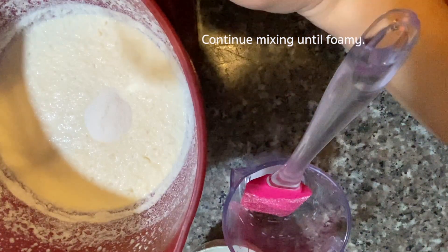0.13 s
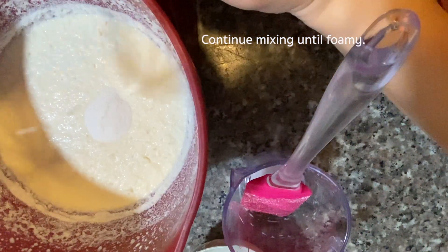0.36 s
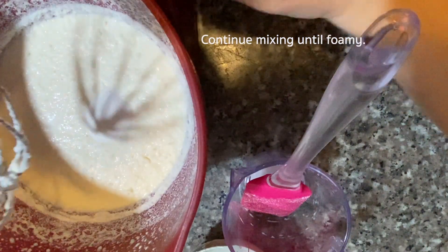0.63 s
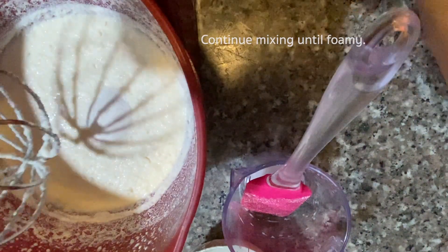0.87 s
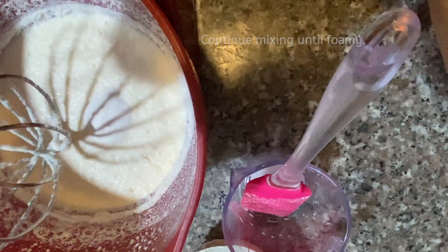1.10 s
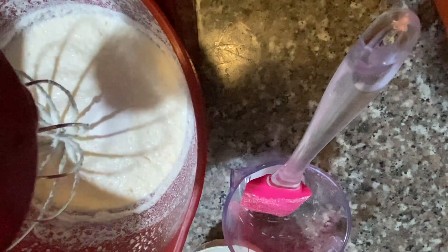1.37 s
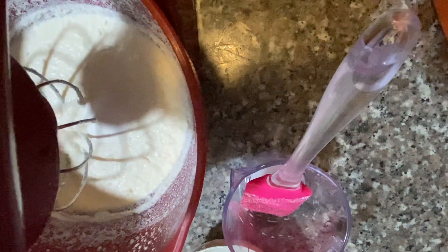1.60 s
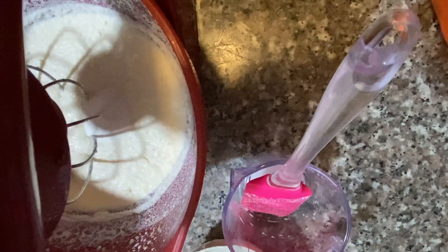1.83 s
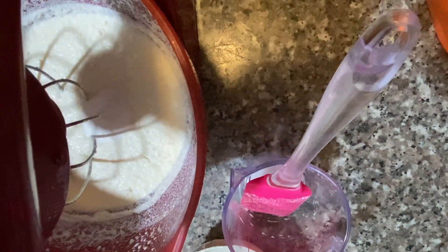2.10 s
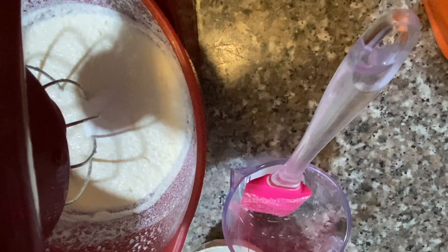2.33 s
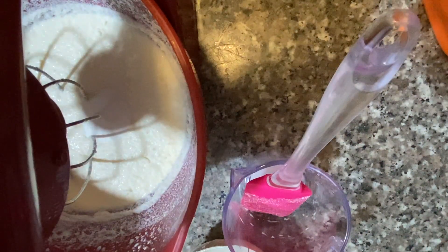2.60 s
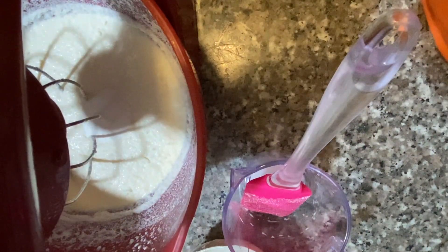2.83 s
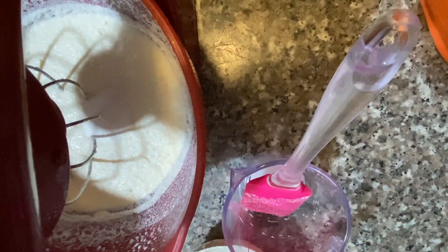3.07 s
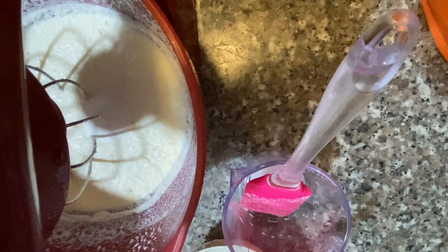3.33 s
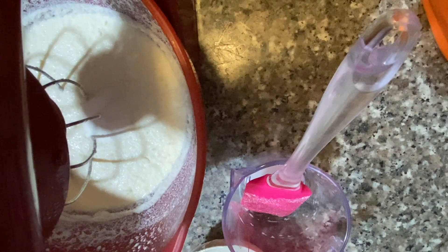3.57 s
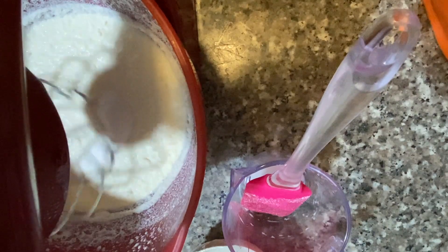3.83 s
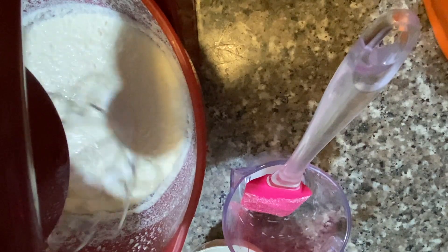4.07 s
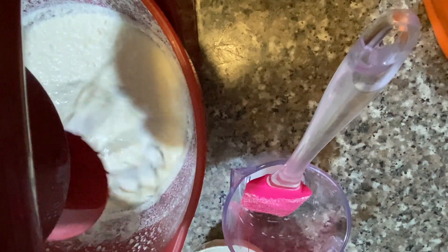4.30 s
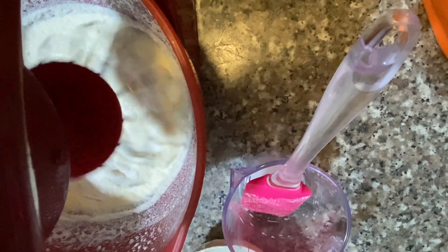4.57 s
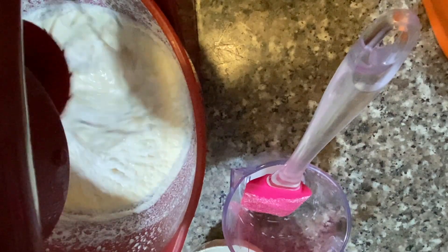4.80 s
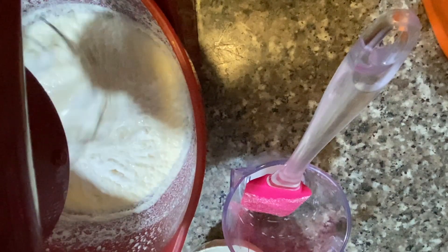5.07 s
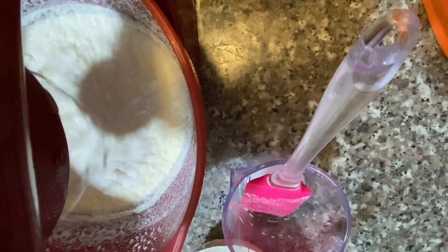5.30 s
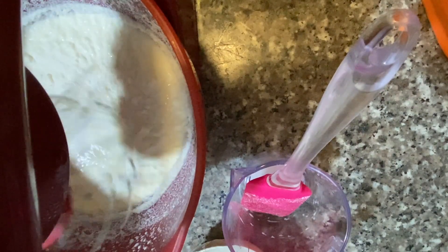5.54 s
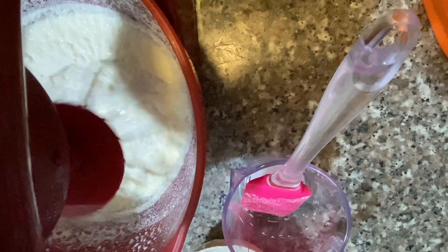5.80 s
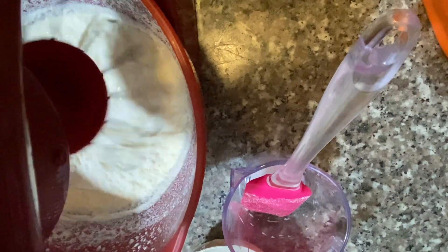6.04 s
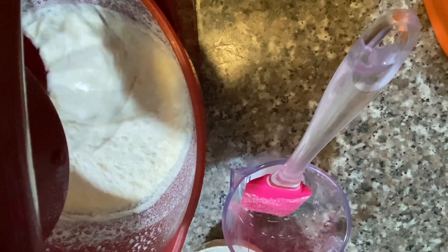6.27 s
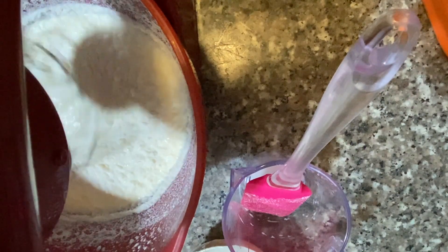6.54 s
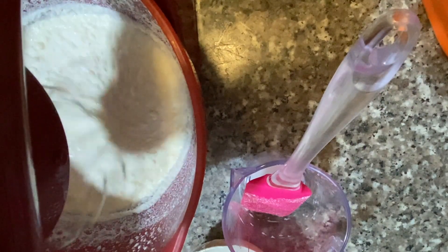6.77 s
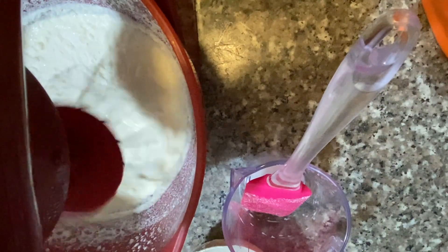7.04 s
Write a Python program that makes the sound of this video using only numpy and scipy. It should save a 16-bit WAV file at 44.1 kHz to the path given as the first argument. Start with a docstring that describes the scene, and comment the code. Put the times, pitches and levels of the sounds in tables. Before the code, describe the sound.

Light plastic bumps and hand friction come first, with a small metallic whisk touch and a hard two-part clack standing out before quieter taps. Then an electric mixer hums, shudders and spins up quickly, holding a loud, buzzy, gear-toned whirr with airy hiss before stepping up in pitch at the end. Close stereo pickup in a kitchen with short reflections and a low, faint room tone.

```python
"""On a kitchen counter a hand mixer with a wire whisk runs in a plastic bowl, heard by two close microphones.
It is first handled: filtered noise bursts and decaying modes make knocks, a latch that snaps twice and
wire touches; grainy noise makes soft rubbing. Then the motor buzzes, spins up, holds its speed and speeds up
again: sines follow the speed through fixed resonances of housing and bowl, over hum, rumble and whirr.
Reflections and a faint room tone surround it."""
import sys
import numpy as np
from scipy import signal
from scipy.fft import rfft, irfft, next_fast_len
from scipy.io import wavfile
from scipy.ndimage import uniform_filter1d

SR = 44100
rng = np.random.default_rng(int(sys.argv[2]) if len(sys.argv) > 2 else 0)


def log_audio(samples):
    """Write samples as a 16-bit WAV file to the path given in sys.argv[1]."""
    # one column per channel
    frames = np.atleast_2d(samples).T
    # limit to full scale, then quantise
    limited = np.clip(frames, -1, 1)
    pcm = np.round(limited * 32767).astype(np.int16)
    wavfile.write(sys.argv[1], SR, pcm)


def ratio_of_db(decibels):
    """Turn decibels (scalar or array-like) into linear amplitude factors; 0 dB maps to 1."""
    return 10 ** (np.asarray(decibels, float) / 20)


N = 315315

# resonances of the whirr, which also lift the gear tones: (frequency [Hz], width [Hz], level [dB])
WHIRR_PEAKS = [(1020, 110, 0), (1570, 110, 1), (1975, 130, 3), (2550, 170, -1), (4950, 250, -14)]
# strongest resonance, shaken hardest in the surges: (frequency [Hz], width [Hz], level [dB])
BOOM = [(440, 75, 0)]
WHIRR_DB = -37   # reference level of the whirr at working speed


def rms_one(x):
    """Scale to rms 1."""
    return x / np.sqrt(np.mean(x ** 2) + 1e-20)


def in_time(rows):
    """Columns of a table, interpolated sample by sample."""
    s, *columns = np.transpose(rows)
    return [np.interp(np.arange(N) / SR, s, c) for c in columns]


def swells(rows):
    """Sum of bells from (centre [s], height, length [s] between the points 41 dB down)."""
    t = np.arange(N) / SR
    return sum(height * np.exp(-(4.36 * (t - s) / length) ** 2) for s, height, length in rows)


def band(x, low_hz, high_hz):
    """Butterworth band-pass."""
    return signal.sosfilt(signal.butter(2, [low_hz, high_hz], "band", fs=SR, output="sos"), x)


def drift(rate):
    """Slow random wander of rms 1: noise through two equal poles of bandwidth rate [Hz]."""
    r = np.exp(-80 * np.pi * rate / SR)   # one step per 40 samples
    white = rng.standard_normal(N // 40 + 2002)
    slow = signal.lfilter([1], [1, -2 * r, r * r], white)[2000:]
    return np.interp(np.arange(N) / 40, np.arange(len(slow)), rms_one(slow))


def coloured(spectrum):
    """Noise of rms 1 shaped by (frequency [Hz], level [dB per Hz])."""
    hz, db = np.transpose(spectrum)
    bins = np.arange(N // 2 + 1) * SR / N
    gain = ratio_of_db(np.interp(np.log(bins + 1), np.log(hz), db))
    return rms_one(irfft(rfft(rng.standard_normal(N)) * gain, N))


def resonate(x, modes):
    """Parallel two-pole resonances from (frequency [Hz], width [Hz], level [dB])."""
    out = 0
    for hz, width, db in modes:
        r = np.exp(-np.pi * width / SR)
        poles = [1, -2 * r * np.cos(2 * np.pi * hz / SR), r * r]
        out = out + ratio_of_db(db) * signal.lfilter([(1 - r * r) / 2, 0, (r * r - 1) / 2], poles, x)
    return out


def tone(turns, waver_db, waver_rate):
    """A sine of rms about 1 whose level and phase wander a little."""
    level = np.sqrt(2) * ratio_of_db(waver_db * drift(waver_rate))
    return level * np.sin(2 * np.pi * (turns + rng.random()) + .5 * drift(waver_rate))


def motor():
    """The drive's speed, load and strain steer its tones and its noise; returns the two."""
    # speed: (time [s], gear mesh tone [Hz])
    speed = [(3.5, 140), (3.9, 286), (4.28, 428), (4.6, 501), (6.45, 501), (6.76, 610), (7.15, 785)]
    # the motor labours and shakes its housing: (time [s], extra level [dB], length [s])
    surges = [(3.62, 14.5, 0.21), (3.735, 19.5, 0.25), (3.92, 16.5, 0.32), (4.1, 11, 0.51),
              (4.32, 11.5, 0.59), (4.52, 7, .12), (6.63, 13.5, 0.48), (6.92, 9.5, 0.21)]
    switch_on_s, engaged_s, creep_db_per_s = 3.3, 3.719, 91.5
    full_pull_hz_per_s = 350   # gain of speed at full strain
    t = np.arange(N) / SR
    mesh_hz, = in_time(speed)
    running = t > switch_on_s
    acceleration = uniform_filter1d(np.gradient(mesh_hz) * SR, size=SR // 8)
    strain = np.clip(acceleration / full_pull_hz_per_s, 0, 1)
    # the drive creeps in until the gears take load
    creep_db = -creep_db_per_s * np.maximum(engaged_s - t, 0)
    surge_db = swells(surges)
    # the whirr grows by 8 dB per octave of speed and with strain
    whirr_db = WHIRR_DB + 8 * np.log2(np.maximum(mesh_hz, 240) / 501) + 1.27 * strain + creep_db
    boom_db = -38 + surge_db + 0.55 * creep_db
    tones = gear_tones(mesh_hz, strain, whirr_db, boom_db) + mains_hum(creep_db, surge_db)
    noise = housing_rumble(whirr_db, boom_db) + whirring(whirr_db)
    return running * tones, running * noise


def gear_tones(mesh_hz, strain, whirr_db, boom_db):
    """Rotor and gear sines follow the speed and swell as they cross fixed resonances."""
    # multiples of the mesh tone, one column: (ratio [1]); the rotor turns at about .259 of it
    ratios = np.array([.088, .13, .2587, .425, .583, .742, .862, 1, 1.258, 1.3, 1.44, 1.552, 1.81, 2.01,
                       2.34, 2.5, 3.125, 3.915, 4.25, 5.05])
    # their strengths in the same sequence, one column: (level [dB])
    levels = ratio_of_db(np.array([-95, -57, -47.5, -61, -46.5, -48.5, -53, -34, -49.5, -44.5, -45.5, -48, -41.5,
                           -35, -50, -35, -42.5, -43.5, -43, -51]))
    # resonances that lift passing tones: (frequency [Hz], width [Hz], level [dB])
    housing = [(264, 100, 1), (670, 65, 2)]
    hunt_hz, hunt_rate_hz = 2.0, 3.0   # the speed hunts around its setting
    turns = np.cumsum(mesh_hz + hunt_hz * drift(hunt_rate_hz)) / SR
    # higher tones waver faster
    orders = np.array([tone(k * turns, waver_db=2.2, waver_rate=5 + 4 * k) for k in ratios])
    upper = ratios > 1
    blur = ratio_of_db(-11 * strain)   # gear tones sink into the noise while the speed rises
    low = (levels * ~upper) @ orders
    high = blur * ((levels * upper) @ orders)
    direct = band(blur * low + high, 26, 990)
    in_housing = resonate(low + high, housing)
    in_peaks = ratio_of_db(-5.5) * resonate(resonate(levels @ orders, WHIRR_PEAKS), WHIRR_PEAKS)
    # the tones grow until the working load is reached
    load = ratio_of_db(1.1 * np.minimum(whirr_db - WHIRR_DB, 0) + 0.15)
    boom = ratio_of_db(boom_db - 5.0) * resonate(resonate(orders.sum(axis=0), BOOM), BOOM)
    return load * (direct + in_housing + in_peaks) + boom


def mains_hum(creep_db, surge_db):
    """Magnetic hum at whole multiples of the mains, with a buzz before the rotor breaks free."""
    # (multiple of the mains [1], rounded for pitch, running level [dB], buzz level [dB])
    harmonics = [(1.986, -9.5, -59), (4.02, -10.5, -72), (5.996, 2, -88), (7.09, -12.5, -52),
                 (7.77, -12, -41.5), (10.05, -18, -57), (12, -4.5, -43.5), (13.9, -25.5, -68),
                 (19.93, -11, -74), (39.84, -17, -80)]
    # rise and fall of the buzz: (time [s], level [dB])
    buzz_course = [(3.36, -35), (3.43, -8.5), (3.58, -3), (3.68, -13)]
    mains_hz = 60.1
    mains = mains_hz * np.arange(N) / SR
    buzz = ratio_of_db(in_time(buzz_course)[0])
    hum_db = -38 + 0.79 * creep_db
    hum = 0
    for multiple, db, buzz_db in harmonics:
        # hum near the boom takes the largest share of each surge
        nearness = np.exp(-np.log2(multiple * mains_hz / BOOM[0][0]) ** 2)
        level = ratio_of_db(hum_db + db + 0.28 * surge_db * nearness) + buzz * ratio_of_db(buzz_db)
        hum = hum + level * tone(round(multiple) * mains, waver_db=3.0, waver_rate=2.7)
    return hum


def housing_rumble(whirr_db, boom_db):
    """Low noise shakes the housing and rings its boom."""
    # rumble spectrum: (frequency [Hz], level [dB per Hz])
    spectrum = [(24, -55), (45, -29), (110, -7), (190, -8), (300, -1), (520, -13), (800, 4), (1100, -5.5),
                (1600, -51.5)]
    shake = coloured(spectrum)
    boom = ratio_of_db(boom_db - 6.5) * rms_one(resonate(resonate(shake, BOOM), BOOM))
    return ratio_of_db(0.52 * whirr_db - 14 + 3.3 * drift(5.2)) * shake + boom


def whirring(whirr_db):
    """Gears and brushes make resonant noise, air through the fan a bright hiss; both flutter together."""
    # whirr spectrum: (frequency [Hz], level [dB per Hz])
    spectrum = [(350, -59), (600, 10), (714, -2), (1320, -2), (1560, 3.5), (2540, -8.5), (4550, -16.5),
                (7260, -28), (8000, -60), (10400, -82), (17600, -120)]
    peaks = resonate(resonate(rng.standard_normal(N), WHIRR_PEAKS), WHIRR_PEAKS)
    whirr = rms_one(coloured(spectrum) + ratio_of_db(11) * peaks)
    air = rms_one(band(rng.standard_normal(N), 8500, 19845))
    # the hiss gains 0.15 extra dB for each dB of whirr
    hiss = ratio_of_db(-23 + 0.15 * (whirr_db - WHIRR_DB)) * air
    return ratio_of_db(whirr_db + 3.5 + 0.88 * drift(42)) * (whirr + hiss)


def knocks():
    """Each blow is a short crack with small bounces that sets off the body modes near its main ring."""
    # (time [s], low ring level [dB], high ring level [dB], treble snap level [dB], main ring [Hz])
    blows = [(0.049, -36, -41.5, -70, 258), (0.1014, -40, -88, -79, 237), (0.1542, -36, -55, -68, 237),
             (0.2844, -39, -51.5, -80, 242), (0.311, -31.5, -38.5, -24.5, 364), (0.426, -62, -70, -45, 254),
             (0.499, -27.5, -37.5, -103, 198), (0.5707, -39, -70, -75, 363), (0.596, -36.5, -55, -75, 313),
             (0.7595, -40.5, -50, -92, 356), (0.877, -54, -59, -46.5, 345), (0.914, -47, -50, -38.5, 397),
             (1.188, -58, -60.5, -53.5, 248), (1.21, -29, -36.5, -40.5, 390), (1.3576, -30, -42, -79, 497),
             (1.4416, -65.5, -62.5, -46, 345), (1.5054, -42, -51.5, -25, 344),
             (1.5247, -40, -49.5, -38.5, 286), (1.641, -49.5, -66.5, -65.5, 290),
             (1.707, -11.5, -21, -5.5, 367), (1.7322, -25, -20, -7.5, 363), (1.9733, -42.5, -46, -41, 330),
             (2.534, -51, -70, -67, 368), (2.594, -51.5, -66, -66, 357), (2.9426, -45.5, -50, -54, 240),
             (2.9749, -43.5, -47, -33.5, 350), (3.0608, -52.5, -65, -84, 340),
             (3.267, -32.5, -41, -25, 413), (6.1764, -53, -50, -25.5, 497), (6.202, -50, -42.5, -20.5, 498)]
    # bowl and mixer body modes: (frequency [Hz], level [dB], decay [s]);
    # decay is to -60 dB below 700 Hz, and about four times shorter above
    body = [(104, -5.5, 0.29), (237, 2.5, 0.16), (293.9, -2.5, 0.22), (341.3, 5.5, 0.072), (361, 0, 0.21),
            (414.6, -5, 0.17), (501.4, 4.5, 0.082), (599.6, -1.5, 0.12), (750, 6.5, 0.035),
            (1080, 7.5, 0.033), (1160, 4.5, 0.02), (1704, -11.5, 0.025), (2400, -19.5, 0.36),
            (3020, -24.5, 0.19), (3980, -23.5, 0.046)]
    rise_s = 0.0022   # a blow builds up
    out, t = np.zeros(N + SR), np.arange(SR // 3) / SR
    upper_modes = [(hz, 9 / decay, db) for hz, db, decay in body if hz >= 700]
    for s, ring_db, clack_db, snap_db, ring_hz in blows:
        noise = rng.standard_normal(len(t))
        shape = np.minimum(t / rise_s, 1) * (np.exp(-(t / 0.0031) ** 2) + 0.25 * np.exp(-t / 0.028))
        for wait, size in rng.random((3, 2)):   # bounces 6 to 12 ms later
            shape += ratio_of_db(-23 - 4.5 * size) * np.exp(-((t - .006 - 0.006 * wait) / 0.0043) ** 2)
        crack = band(band(noise * shape, 1300, 5000), 1300, 5000)
        snap = band(noise[::-1] * shape ** 2, 7000, 15500)
        # the crack grows with both the high ring and the snap
        crack = (ratio_of_db(clack_db - 10) + ratio_of_db(snap_db + 1)) * crack + ratio_of_db(snap_db) * snap
        ring = 0
        for hz, db, decay in body:
            if hz < 700:
                size, phase = rng.random(2)
                off_db = 12.4 * min(abs(np.log2(hz / ring_hz)), 1)   # weaker away from the main ring
                level = ratio_of_db(ring_db + 3.0 - off_db + db + 0.51 * (size - 2.0) - 60 * t / decay)
                ring = ring + level * np.sin(2 * np.pi * (hz * t + phase))
        ring = ring * (1 - np.exp(-t / 0.0034))   # swells as the body takes up the blow
        # the crack rattles the upper modes
        clack = ratio_of_db(clack_db + 19.5) * resonate(band(noise * shape, 350, 3900), upper_modes)
        i = round(s * SR)
        out[i:i + len(t)] += crack + ring + clack
    return out[:N]


def wires():
    """The whisk touches the bowl: each burst of a few ms sets the wire modes ringing."""
    # (time [s], level [dB])
    touches = [(0.4998, -22), (1.21, -36)]
    # wire modes: (frequency [Hz], level [dB], decay [s]); the ring takes about 1.8 times that to -60 dB
    wire_modes = [(2680, 1.5, 0.024), (3040, 3.5, 0.031), (2370, -11.5, .05)]
    t = np.arange(N) / SR
    pulses = sum(ratio_of_db(db) * (t > s) * np.exp(-(np.maximum(t - s, 0) / .004) ** 2) for s, db in touches)
    burst = pulses * rng.standard_normal(N)
    return ratio_of_db(17.5) * resonate(burst, [(hz, 1.2 / decay, db) for hz, db, decay in wire_modes])


def rubbing():
    """Hands on plastic make grainy friction noise, with bright strokes on top."""
    # hands rubbing on plastic: (time [s], level [dB], length [s])
    rub_rows = [(0.04, -46.5, 0.53), (.38, -53, 0.26), (.62, -64, 0.18), (1.35, -64.5, 1.6),
                (1.9, -47.5, 0.52), (2.58, -63, 0.3), (2.82, -54.5, .2), (2.96, -57.5, 0.12),
                (3.06, -59, 0.22), (3.4, -61, 1.9)]
    # short bright strokes of skin on plastic: (time [s], level [dB], length [s])
    stroke_rows = [(0.008, -45.5, 0.093), (0.173, -64, 0.078), (0.35, -73, 0.064), (0.647, -66, 0.21),
                   (1.052, -66.5, 0.13), (1.221, -55, 0.32), (1.897, -63, 0.35), (2.277, -76.5, 0.36),
                   (2.52, -64.5, 0.025), (2.587, -65.5, 0.037), (2.7, -78, 0.13), (2.808, -60, 0.13)]
    white = rng.standard_normal((3, N))
    rubs = swells([(s, ratio_of_db(db), length) for s, db, length in rub_rows])
    strokes = swells([(s, ratio_of_db(db), length) for s, db, length in stroke_rows])
    low = rms_one(band(white[0], 150, 900))
    body = ratio_of_db(6.5) * resonate(white[1], [(1250, 200, 0.0011)])
    middle = ratio_of_db(-7.5) * rms_one(band(white[1], 630, 4000) + body)
    bright = rms_one(band(white[2], 1200, 15300))
    grip = ratio_of_db(-68.5)   # faint friction of the grip between rubs
    grain = ratio_of_db(3 * drift(45))
    return grain * ((rubs + grip) * (low + middle) + strokes * bright)


def kitchen(x):
    """Dense reflections: dying noise of its own on each side, the treble dying sooner."""
    low_t60_s, treble_t60_s, split_hz = .62, 0.3, 5000
    t = np.arange(SR) / SR
    white = rng.standard_normal((2, SR)) * np.clip(t / .008, 0, 1)   # the low part builds up over 8 ms
    low = band(white, 190, split_hz) * ratio_of_db(-60 * t / low_t60_s)
    # turned round in time, so the treble starts at once
    treble = ratio_of_db(5.5) * band(white[::-1, ::-1], split_hz, 11000) * ratio_of_db(-60 * t / treble_t60_s)
    tail = low + treble
    return signal.fftconvolve(x[None], tail / np.sqrt(np.sum(tail ** 2) / 2), axes=1)[:, :N]


def room_tone():
    """Far ventilation as noise, partly alike on both sides only in the bass, and appliances as steady tones."""
    # ventilation spectrum: (frequency [Hz], level [dB per Hz])
    spectrum = [(18, -34.5), (30, -3), (150, 0), (204, -7.5), (357, -7.5), (532, -18), (641, -16),
                (1420, -24), (2610, -34.5), (8000, -55.5), (10400, -76.5), (17600, -120)]
    # steady far tones: (frequency [Hz], level [dB])
    appliances = [(158, -60.5), (2620, -81.5)]
    shared = coloured(spectrum)
    own = np.array([coloured(spectrum), coloured(spectrum)])
    air = band(shared, 46, 440) + band(own, 400, 13000) + ratio_of_db(-4) * band(own, 22, 400)
    t = np.arange(N) / SR
    lines = sum(ratio_of_db(db) * tone(hz * t, waver_db=2.5, waver_rate=6.0) for hz, db in appliances)
    return ratio_of_db(-53) * rms_one(air) + lines


def scene():
    """Direct sound reaches the right port shifted and often weaker; below the treble each side has its own wash."""
    # right microphone port against the left, shaded by the body between them:
    # (frequency [Hz], loss [dB], phase lag [rad])
    right_port = [(170, 0, .3), (345, 0, .6), (515, 2, .9), (690, 5, 2.2), (1030, 7, 3.2), (1380, 4, 3.85),
                  (2070, 1, 4.15), (2410, 9, 5.7), (2930, 5, 7.3), (4130, 6, 8), (4820, 7, 11.5),
                  (5680, 8, 10.3), (6890, 6, 11.6), (7700, 0, 10.15), (16000, 0, -3.5)]
    alike_hz = 7400   # above this the room, too, reaches both ports by the same path
    tones, noise = motor()
    blows, hands = knocks() + wires(), rubbing()
    direct = ratio_of_db(1.5) * (blows + tones + noise + hands)
    into_room = ratio_of_db(-17) * tones + ratio_of_db(-3.5) * noise + ratio_of_db(-13.5) * blows + ratio_of_db(-6.5) * hands
    room = kitchen(into_room) + room_tone()
    top = signal.sosfiltfilt(signal.butter(6, alike_hz, "high", fs=SR, output="sos"), room)
    left = direct + top[0]
    hz, loss_db, lag = np.transpose(right_port)
    size = next_fast_len(N + SR // 10)
    bins = np.arange(size // 2 + 1) * SR / size
    port = ratio_of_db(-np.interp(bins, hz, loss_db)) * np.exp(-1j * np.interp(bins, hz, lag))
    right = irfft(rfft(left, size) * port, size)[:N]
    return np.array([left, right]) + room - top


def roll_off(x):
    """The treble ends steeply here."""
    return signal.sosfilt(signal.butter(12, 16530, fs=SR, output="sos"), x)


def record(dry):
    """The deepest bass and the top drop out; the highest peaks are rounded."""
    x = signal.sosfilt(signal.butter(2, 48, "high", fs=SR, output="sos"), dry)
    x = signal.sosfilt(signal.butter(16, 15600, fs=SR, output="sos"), x)
    x = x / (1 + (abs(x) / .9) ** 6) ** (1 / 6)
    return roll_off(x)


dry = scene()
out = record(dry)
log_audio(out)
```